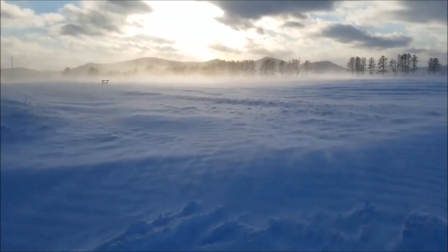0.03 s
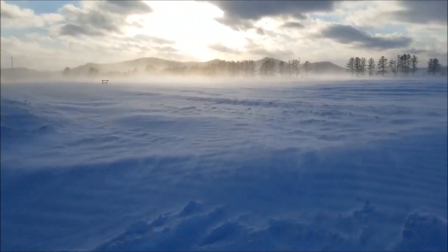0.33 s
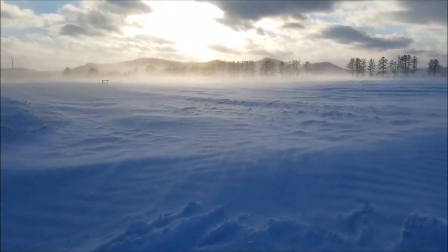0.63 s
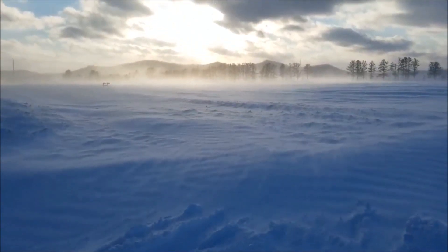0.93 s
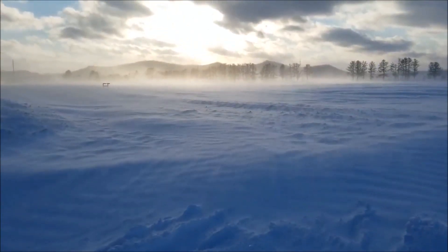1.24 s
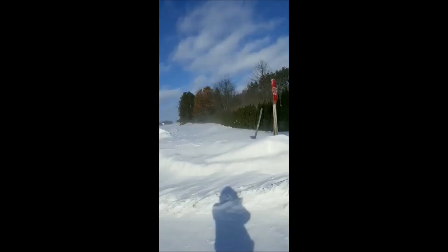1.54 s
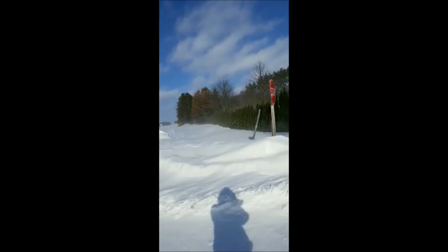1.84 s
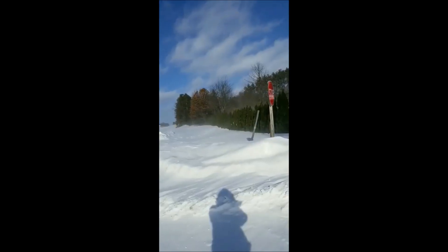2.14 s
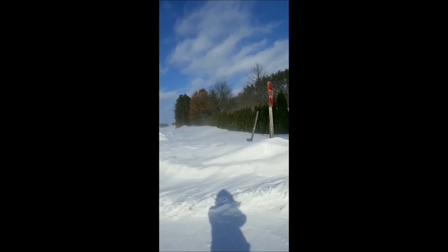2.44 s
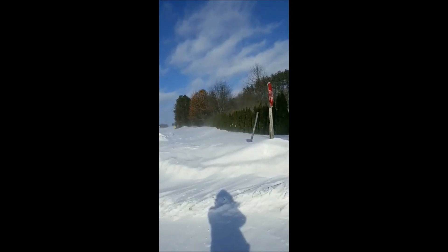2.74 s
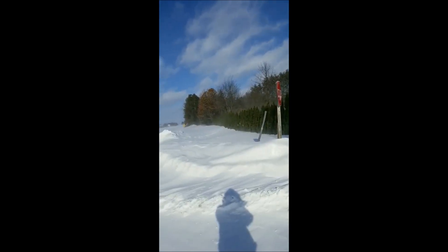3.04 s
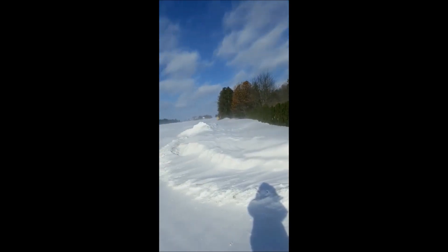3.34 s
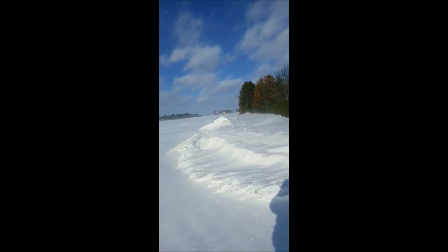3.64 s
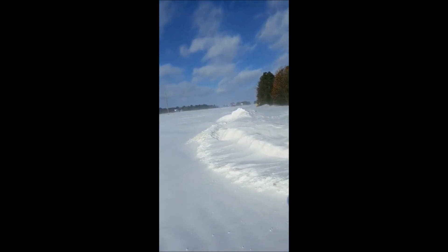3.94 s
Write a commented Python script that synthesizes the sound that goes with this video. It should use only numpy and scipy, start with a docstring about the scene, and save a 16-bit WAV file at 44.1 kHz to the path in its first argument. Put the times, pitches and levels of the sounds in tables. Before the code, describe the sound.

Strong wind flutters roughly on the microphone in open snow, wide in stereo, with small pops. At about 1.6 seconds it stops with a click. After a short silence, it returns near 1.9 seconds as a deeper mono rumble, gusting and thumping until 4 seconds over a soft hiss of drifting snow. Metal tinkles very faintly between 2.2 and 3.3 seconds, and dry ticks come near 2.6 and 3.5.

```python
"""Strong wind flutters on a microphone in open snow, in stereo: two ports, each with its own turbulence.
It stops with a click. After a short silence it rumbles and thumps on a single port, over the hiss of
drifting snow. Gusts set the level, passing eddies bunch the noise, and single hard eddies hit as
pressure pulses. A small metal part tinkles faintly, the treble dips briefly a few times, and two ticks
ring the housing like snow grains."""
import sys
import numpy as np
from scipy import signal
from scipy.io import wavfile
from scipy.ndimage import uniform_filter1d

SR = 44100
rng = np.random.default_rng(int(sys.argv[2]) if len(sys.argv) > 2 else 0)


def to_wav(s):
    """Save 16-bit WAV."""
    ch = np.atleast_2d(s).T  # columns
    pcm = np.round(np.clip(ch, -1, 1) * 32767)  # PCM
    wavfile.write(sys.argv[1], SR, pcm.astype(np.int16))


N = 176400
T = np.arange(N) / SR
FLUTTER_END_S, RUMBLE_START_S = 1.615, 1.856


def from_db(db):
    """Decibels to gain."""
    return 10 ** (np.asarray(db) / 20)


def unit_rms(x):
    """Scale to rms 1."""
    return x / np.sqrt(np.mean(x ** 2) + 1e-20)


def curves(rows):
    """Each level column of a time table, at every sample."""
    times_s, *columns = np.transpose(rows)
    return [np.interp(T, times_s, column) for column in columns]


def relative_db(level_db, active):
    """A level curve relative to its mean power while active."""
    return level_db - 10 * np.log10(np.mean(from_db(level_db[active]) ** 2))


def wander(rate_hz):
    """Smooth random motion, spread about 1, softly limited."""
    pole = np.exp(-2 * np.pi * rate_hz / (SR / 10))
    white = rng.standard_normal(N // 10 + 4002)
    slow = signal.lfilter([1], [1, -2 * pole, pole * pole], white)[4000:]
    slow = 2.5 * np.tanh(unit_rms(slow) / 2.5)
    return np.interp(np.arange(N) / 10, np.arange(len(slow)), slow)


def band(x, low_hz, high_hz, order=2):
    """Band-pass, gentle by default."""
    sos = signal.butter(order, [low_hz, min(high_hz, .45 * SR)], "band", fs=SR, output="sos")
    return signal.sosfilt(sos, x)


def noise_bands(spectrum):
    """Half-octave noise bands that follow a spectrum: yields (centre/Hz, signal)."""
    points_hz, points_db = np.transpose(spectrum)
    edges_hz = 22 * 2 ** np.arange(0, 9.6, .5)
    white = rng.standard_normal((2, N))
    for k, (low_hz, high_hz) in enumerate(zip(edges_hz, edges_hz[1:])):
        hz = np.sqrt(low_hz * high_hz)
        if points_hz[0] < hz < points_hz[-1]:
            level_db = np.interp(np.log(hz), np.log(points_hz), points_db)
            yield hz, from_db(level_db) * band(white[k % 2], low_hz, high_hz, order=3)


def port_turbulence(spectrum, low_db, high_db, low_hz, high_hz, bass_hz,
                    churn_db, churn_hz, flutter_db, flutter_hz, patchy_db):
    """Wind on one port: gusts set low and high band levels; eddies bunch the energy above the bass."""
    eddy_life_s = 0.046
    eddies_db = churn_db * wander(churn_hz) + flutter_db * wander(flutter_hz)
    wind = 0
    for hz, noise in noise_bands(spectrum):
        height = np.clip(np.log(hz / low_hz) / np.log(high_hz / low_hz), 0, 1)
        gust = from_db(low_db + height * (high_db - low_db))
        shake = from_db(eddies_db * hz / (hz + bass_hz) + patchy_db * wander(25))
        # slower changes are left to the gusts
        shake /= np.sqrt(uniform_filter1d(shake ** 2, int(eddy_life_s * SR)))
        wind = wind + noise * shake * gust
    return wind


def hard_eddies(rows, spray_hz=(544, 1450)):
    """Each eddy is one push and pull of pressure, with a spray of finer turbulence inside."""
    spray = unit_rms(band(band(rng.standard_normal(N), *spray_hz), 100, 2100))
    pressure = 0
    for at_s, level_db, half_width_ms, spray_db in rows:
        u = (T - at_s) / (half_width_ms / 1000)
        push_pull = -u * np.exp((1 - u * u) / 2)
        puff = from_db(spray_db) * spray * np.exp(-(u / 2.7) ** 2)
        pressure = pressure + from_db(level_db) * (push_pull + puff)
    return pressure


# Gusts, each level relative to its own mean: t/s, flutter level/dB, treble level/dB
FLUTTER_GUSTS = [(0.0, -30, -53), (0.026, -37, -51), (0.062, -40.5, -70.5), (0.08, -34, -58.5),
                 (0.11, -38, -65.5), (0.225, -41, -62), (0.254, -34, -52.5), (0.274, -43, -62.5),
                 (0.298, -32, -58), (0.315, -37.5, -60), (0.365, -39, -67), (0.39, -38.5, -60),
                 (0.424, -38, -65), (0.442, -34.5, -54.5), (0.465, -33.5, -58), (0.54, -36, -64),
                 (0.57, -40.5, -68), (0.616, -35, -59.5), (0.688, -36.5, -61), (0.704, -41, -58),
                 (0.714, -33, -53), (0.788, -31.5, -54.5), (0.81, -40.5, -61.5), (0.848, -33.5, -63.5),
                 (0.872, -41, -54), (0.942, -32, -59.5), (0.956, -26.5, -50), (0.978, -34.5, -51),
                 (1.015, -33, -50), (1.035, -40, -58.5), (1.078, -37.5, -58.5), (1.094, -30.5, -47),
                 (1.118, -33, -57.5), (1.148, -43, -64), (1.165, -34, -65), (1.238, -38, -59),
                 (1.258, -33.5, -59.5), (1.322, -33, -53), (1.355, -37, -63), (1.376, -34, -57.5),
                 (1.392, -28.5, -48.5), (1.474, -36, -58.5), (1.604, -31, -40)]
# Turbulence spectrum: f/Hz, relative density/dB
FLUTTER_SPECTRUM = [(15, -44), (25, -12.5), (100, -1), (195, -7), (330, 1), (450, -1), (740, -7),
                    (1210, -13), (2130, -20), (2860, -25.5), (5500, -44), (7150, -91.5)]
# Hard eddies: t/s, peak level/dB, half width/ms, relative spray level/dB
FLUTTER_EDDIES = [(.167, -27, 0.3, -16), (.2, -24.5, 0.33, -12), (.497, -37, 0.83, 8),
                  (.674, -22, 0.52, -17), (.732, -23.5, 0.7, -6), (.776, -21, 0.33, -10),
                  (.930, -25.5, 0.36, -17.5), (.9565, -12.5, 0.28, -14.5), (.971, -27.5, 1.84, -27.5),
                  (1.217, -23, 0.28, -2.5), (1.249, -31, 0.43, -2), (1.382, -21.5, 0.21, -14),
                  (1.484, -24.5, 0.22, -0.5), (1.593, -17, 0.21, -14)]


def fluttering_wind(level_db=-30.5, top_hz=5640):
    """Two ports in the same gusts, each with unrelated turbulence; the hardest flutter fizzes faintly."""
    active = T < FLUTTER_END_S
    body_db, treble_db = (relative_db(curve, active) for curve in curves(FLUTTER_GUSTS))
    ports = np.array([
        port_turbulence(FLUTTER_SPECTRUM, body_db, treble_db, low_hz=510, high_hz=2230, bass_hz=153.7,
                        churn_db=5.2, churn_hz=38, flutter_db=4.0, flutter_hz=160, patchy_db=2.5)
        for _ in range(2)])
    ports = from_db(level_db) * ports / np.std(ports[:, active], axis=1, keepdims=True)
    ports += np.array([hard_eddies(FLUTTER_EDDIES) for _ in range(2)])
    dull = signal.sosfilt(signal.ellip(8, .5, 60, top_hz, fs=SR, output="sos"), ports)
    spatter = band(ports, 1500, 5000) * rng.standard_normal((2, N))
    fizz = from_db(-38.5) * band(spatter, 5470, 9500)
    fade = np.exp(-((T - FLUTTER_END_S) / 0.017) ** 2)
    tail = from_db(-23.5) * fade * band(dull, 40, 2820)
    return np.where(active, dull + fizz, tail)


def strike(at_s, level_db, decay_s):
    """Instant attack, exponential decay."""
    return from_db(level_db) * (T >= at_s) * np.exp(-np.abs(T - at_s) / decay_s)


def click():
    """A sharp click as the scene changes, where the flutter stops."""
    return strike(FLUTTER_END_S, level_db=-22.5, decay_s=0.00027)


# Gusts, each level relative to its own mean: t/s, rumble level/dB, flutter level/dB
RUMBLE_GUSTS = [(1.86, -54, -56.5), (1.925, -40, -51.5), (1.96, -30.5, -38), (2.0, -40, -55.5),
                (2.04, -27.5, -35), (2.095, -42.5, -41.5), (2.12, -27.5, -34.5), (2.14, -24, -44),
                (2.18, -19, -28), (2.215, -28, -50), (2.23, -22.5, -36.5), (2.26, -32.5, -52),
                (2.37, -31.5, -51), (2.41, -24.5, -31), (2.45, -25.5, -38.5), (2.49, -27, -44),
                (2.54, -29, -47), (2.615, -25.5, -30), (2.68, -28, -43.5), (2.78, -39.5, -53),
                (2.82, -42, -48), (2.84, -28, -36.5), (2.9, -24, -28.5), (2.985, -23.5, -32),
                (3.02, -24.5, -47.5), (3.085, -34, -54), (3.12, -16.5, -31.5), (3.16, -36.5, -60.5),
                (3.18, -26, -35), (3.21, -26, -47.5), (3.31, -29, -42), (3.33, -17.5, -30.5),
                (3.36, -28.5, -50.5), (3.4, -22.5, -41), (3.43, -31, -49.5), (3.455, -19, -30.5),
                (3.475, -23.5, -55), (3.52, -33.5, -51.5), (3.555, -25.5, -45.5), (3.585, -38.5, -56),
                (3.62, -23.5, -29), (3.64, -28, -46.5), (3.665, -12.5, -40.5), (3.71, -27.5, -39.5),
                (3.73, -29.5, -39.5), (3.755, -20.5, -41.5), (3.81, -30.5, -50.5), (3.84, -24.5, -43),
                (3.89, -32.5, -48.5), (3.99, -27.5, -53), (4.0, -50, -63.5)]
# Turbulence spectrum: f/Hz, relative density/dB
RUMBLE_SPECTRUM = [(15, -38), (25, -14), (65, -0.5), (152, -2.5), (233, -5.5), (440, -15.5), (821, -26.5),
                   (928, -31.5), (2090, -44.5), (3200, -49), (4160, -72), (7040, -120)]
# Hard eddies: t/s, peak level/dB, half width/ms, relative spray level/dB
RUMBLE_EDDIES = [(2.045, -19, 0.62, -14), (2.142, -17, 1.1, -29), (2.186, -14, 2.4, -28.5),
                 (2.234, -28.5, 0.82, -5.5), (2.433, -14.5, 1.1, -24), (2.625, -21.5, 0.35, -20),
                 (2.833, -14.5, 1.23, -27), (2.902, -27, 0.47, -3), (2.972, -19.5, 0.53, -12.5),
                 (2.993, -18, 2.5, -33), (3.122, -24.5, 0.22, -4), (3.453, -12.5, 2.17, -31.5),
                 (3.618, -12.5, 0.63, -23.5), (3.621, -17.5, 0.86, -25.5), (3.657, -18, 0.7, -36),
                 (3.679, -13, 0.99, -28), (3.751, -10, 1.85, -27)]


def rumbling_wind(drive_db=-25.5, overload=0.2):
    """Heavy lumpy gusts on one port, which rounds off their peaks; hard eddies thump on top."""
    active = T > RUMBLE_START_S
    low_db, high_db = (relative_db(curve, active) for curve in curves(RUMBLE_GUSTS))
    wind = port_turbulence(RUMBLE_SPECTRUM, low_db, high_db, low_hz=116, high_hz=530, bass_hz=202,
                           churn_db=4.5, churn_hz=70, flutter_db=2.5, flutter_hz=87, patchy_db=0.5)
    wind = from_db(drive_db) * wind / np.std(wind[active]) * active
    return overload * np.tanh(wind / overload) + hard_eddies(RUMBLE_EDDIES)


# Hiss envelope: t/s, level before gain/dB
HISS_ENVELOPE = [(1.856, -90), (1.92, -73.5), (2.02, -66), (2.2, -61.5), (2.55, -61), (2.95, -62),
                 (3.5, -63), (3.75, -66.5), (4, -67)]
# Hiss spectrum: f/Hz, relative density/dB
HISS_SPECTRUM = [(590, -6), (1000, -3), (1730, -9), (2150, -9), (2940, -11), (4600, -12.5), (6630, -26),
                 (9060, -33), (12300, -20), (15100, -23), (16000, -29)]


def snow_hiss(gain_db=7):
    """Blowing snow: a smooth hiss that fades in, then eases."""
    level_db, = curves(HISS_ENVELOPE)
    hiss = unit_rms(sum(noise for _, noise in noise_bands(HISS_SPECTRUM)))
    return hiss * from_db(gain_db + level_db) * (T > RUMBLE_START_S)


# Touches on the metal part: t/s, level/dB, top mode lift/dB
METAL_TOUCHES = [(2.224, -58, -5), (2.891, -65, 7), (2.958, -57.5, -3), (3.258, -60, -2)]
# Its modes: f/Hz, relative level/dB, t60/s
METAL_MODES = [(9600, -18, .1), (12100, 5, 0.062), (14650, 0, .08)]


def metal_tinkle():
    """A small metal part rings thinly; its top mode varies from touch to touch."""
    top_hz = METAL_MODES[-1][0]
    rings = 0
    for hz, mode_db, t60_s in METAL_MODES:
        envelope = sum(strike(at_s, level_db + mode_db + lift_db * (hz == top_hz), t60_s / np.log(1000))
                       for at_s, level_db, lift_db in METAL_TOUCHES)
        rings = rings + envelope * np.sin(2 * np.pi * hz * T)
    return rings


# Treble dips: t/s, depth/dB
TREBLE_DIPS = [(2.238, 23), (2.986, 12), (3.306, 10), (3.412, 10), (3.882, 9.7)]


def dip_treble(x, above_hz=3100, half_width_s=0.0085):
    """The treble drops out for a few brief moments."""
    dip_db = sum(depth_db * np.exp(-((T - at_s) / half_width_s) ** 2) for at_s, depth_db in TREBLE_DIPS)
    low = signal.sosfiltfilt(signal.butter(2, above_hz, fs=SR, output="sos"), x)
    return low + (x - low) * from_db(-dip_db)


# Taps on the housing: t/s, impulse level/dB
HOUSING_TAPS = [(2.559, -18), (3.549, -14)]
# Its resonances: f/Hz, bandwidth/Hz, gain/dB
HOUSING_MODES = [(1595, 1100, 2), (5200, 1400, 1.5), (8900, 9000, -19)]


def housing_ticks():
    """Dry ticks, like snow grains: impulses ring the housing's broad resonances."""
    taps = sum(from_db(level_db) * (np.arange(N) == int(at_s * SR)) for at_s, level_db in HOUSING_TAPS)
    taps += 1e-18  # keeps the filters from underflowing
    return sum(from_db(gain_db) * band(taps, max(hz - width_hz / 2, 100), hz + width_hz / 2)
               for hz, width_hz, gain_db in HOUSING_MODES)


def scene():
    """Stereo flutter, then mono rumble, hiss and small contacts, over a very faint noise floor."""
    floor = from_db(-100) * unit_rms(band(rng.standard_normal(N), 30, 600))
    flutter = fluttering_wind() + click()
    rumble_and_hiss = dip_treble(rumbling_wind() + snow_hiss())
    return flutter + rumble_and_hiss + metal_tinkle() + housing_ticks() + floor


def record(dry):
    """Steep low-pass at 15.8 kHz."""
    return signal.sosfilt(signal.ellip(10, .2, 80, 15800, fs=SR, output="sos"), dry)


dry = scene()
out = record(dry)
to_wav(out)
```